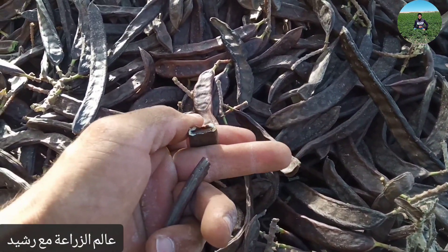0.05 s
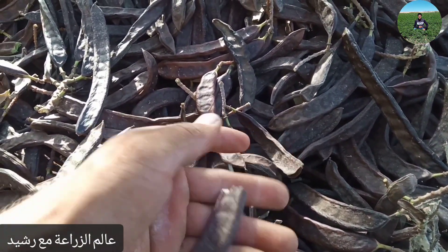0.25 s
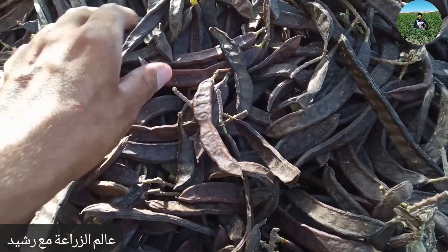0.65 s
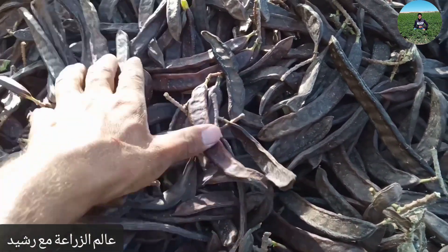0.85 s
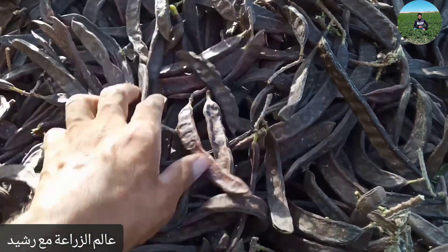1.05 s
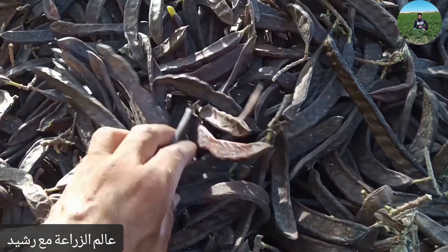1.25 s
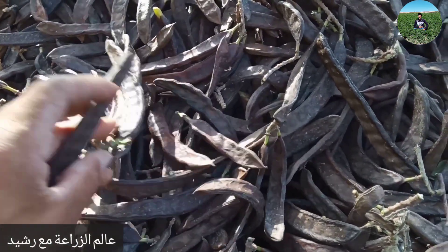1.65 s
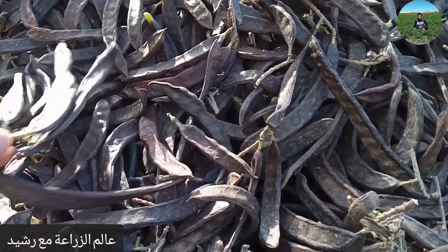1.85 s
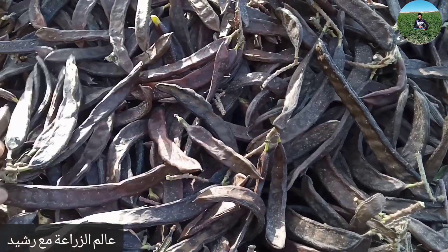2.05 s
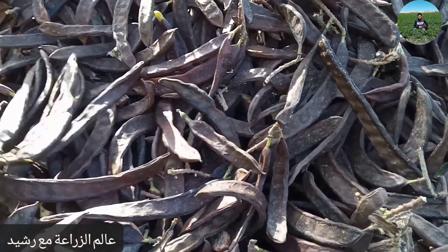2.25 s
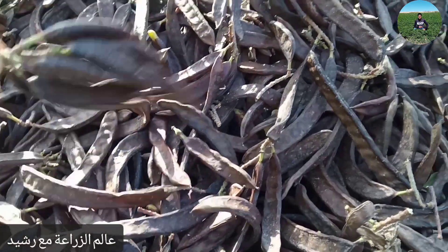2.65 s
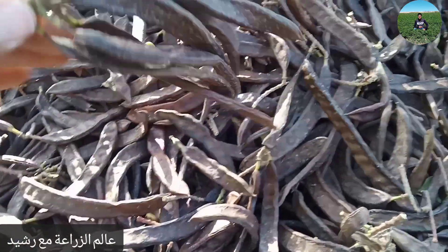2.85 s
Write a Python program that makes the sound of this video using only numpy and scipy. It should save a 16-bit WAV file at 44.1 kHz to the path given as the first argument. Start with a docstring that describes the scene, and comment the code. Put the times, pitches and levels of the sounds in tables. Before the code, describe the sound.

Dry pods clack and rustle under a hand, close to the microphone outdoors. A few pieces drop with sharp clicks, then a dense burst of rummaging thins into lighter stirring and a brief rattle, over faint open air.

```python
"""Outdoors, close to a pile of dry carob pods, on one microphone.
A hand drops pieces of pod on the pile, rummages through it and lets the pods settle.
Up front, each hard contact rings a pod's woody shell for a few milliseconds. Countless small contacts
and sliding husks make the rustle; skin brushes past, the pile thuds and one pod rattles.
A faint, even rumble of open air lies behind it all."""
import sys
import numpy as np
from scipy import signal
from scipy.fft import rfft, irfft, next_fast_len
from scipy.io import wavfile
from scipy.ndimage import uniform_filter1d, map_coordinates

SR = 44100
rng = np.random.default_rng(int(sys.argv[2]) if len(sys.argv) > 2 else 0)


def to_wav(sig):
    """Store sig (one row per channel, or 1-D mono) as 16-bit WAV at the path in sys.argv[1].

    Samples outside -1..1 are clipped; the rate is SR.
    """
    pcm = np.clip(np.atleast_2d(sig), -1, 1) * 32767
    pcm = np.round(pcm).astype(np.int16)
    wavfile.write(sys.argv[1], SR, pcm.T)  # frames by channels


N = 127890
SIZE = 8192  # samples in one short sound or filter


def amp(db):
    """Decibels to gain."""
    return 10 ** (np.asarray(db) / 20)


def unit(x):
    """Scale to rms 1."""
    return x / np.sqrt(np.mean(x ** 2) + 1e-20)


def along(points, hz):
    """Read (Hz, value) points on a log frequency axis."""
    f, v = np.transpose(points)
    return np.interp(np.log(hz + 1), np.log(f + 1), v)


def fade(t, t60):
    """Exponential decay, 60 dB down at t60."""
    return np.exp(-np.log(1000) * t / t60)


def add(track, start, sound):
    """Mix a sound into the track at start seconds."""
    part = track[max(round(start * SR), 0):][:len(sound)]
    part += sound[:len(part)]


def minimum_phase(db):
    """Causal frequency response with these gains."""
    cepstrum = irfft(np.log(amp(db)))
    cepstrum[1:SIZE // 2] *= 2
    cepstrum[SIZE // 2 + 1:] = 0
    return np.exp(rfft(cepstrum))


def coloured(x, spectrum):
    """Pass x through a body with this spectrum and scale it to rms 1."""
    body = irfft(minimum_phase(along(spectrum, np.fft.rfftfreq(SIZE, 1 / SR))))
    return unit(signal.fftconvolve(x, body)[:len(x)])


def friction(rough_db, flutter_per_s):
    """Rough surfaces rubbing: noise whose level flutters at random."""
    noise = rng.standard_normal(N)
    position = np.arange(N) * flutter_per_s / SR
    flutter = map_coordinates(rng.standard_normal(4000), [position], mode="mirror")
    return noise * amp(rough_db * flutter)


# The open air behind the pile. Each row: frequency in Hz, relative level in dB.
AIR_SPECTRUM = [(25, -19), (50, -12), (85, -0.5), (150, -2), (300, -4.5), (550, -7.5), (1100, -13),
                (2500, -17), (6500, -30), (10000, -28.5), (15500, -37)]
def outdoor_air():
    """Faint, even rumble and hiss."""
    return amp(-63.5) * coloured(rng.standard_normal(N), AIR_SPECTRUM)


# The low body of the pile. Each row: frequency in Hz, relative level in dB.
THUD_SPECTRUM = [(40, -30), (130, 27), (330, 3.5), (600, 25), (2000, -38)]
# The hand bumps the pile. Each row: start in seconds, level in dB before the envelope.
BUMPS = [(.276, -56), (.83, -48), (1.058, -58), (1.215, -59), (2.47, -56)]
def pile_thuds(t60=0.14, rise_s=0.014):
    """The whole pile answers a bump with a soft, low thud."""
    out, t = np.zeros(N), np.arange(SIZE) / SR
    for start, db in BUMPS:
        body = coloured(rng.standard_normal(SIZE), THUD_SPECTRUM)
        add(out, start, amp(db) * body * fade(t, t60) * (1 - fade(t, rise_s)))
    return out


# The bright hiss of skin on husk. Each row: frequency in Hz, relative level in dB.
BRUSH_SPECTRUM = [(300, -44), (2000, 9), (5000, 5), (7000, 11.5), (9500, 2.5), (12000, 1.5), (15500, -13)]
# Light strokes of the hand. Each row: centre in seconds, half length in seconds, level in dB.
STROKES = [(0.105, 0.048, -65.5), (1.06, 0.042, -48.5), (1.185, 0.047, -43.5), (1.476, 0.038, -57),
           (1.897, 0.048, -59), (2.063, 0.071, -54.5), (2.238, 0.11, -60.5), (2.462, 0.05, -52),
           (2.585, 0.0081, -54), (2.7, 0.068, -60)]
def skin_brushes():
    """Skin and husk brush past each other in soft swishes that swell and fade."""
    t = np.arange(N) / SR
    swell = sum(amp(db) * np.exp(-((t - centre) / half) ** 2) for centre, half, db in STROKES)
    return swell * coloured(friction(rough_db=3, flutter_per_s=240), BRUSH_SPECTRUM)


# Touches of one swung pod. Each row: start in seconds, level in dB before the envelope.
RATTLE_TOUCHES = [(2.522, -38), (2.644, -42), (2.676, -37.5), (2.69, -41), (2.712, -45)]
def pod_rattle(note_hz=1745, t60=0.026, rise_s=0.0052):
    """A swung pod rattles with one hollow note, its pitch a little different at each touch."""
    out, t = np.zeros(N), np.arange(SIZE) / SR
    for start, db in RATTLE_TOUCHES:
        hz = note_hz * (1 + 0.026 * rng.standard_normal())
        add(out, start, amp(db) * np.sin(2 * np.pi * hz * t) * fade(t, t60) * (1 - fade(t, rise_s)))
    return out


def small_ticks(per_s=600, spread_db=3, crack_t60=0.0094, ring_t60=0.017, count=3000, samples=900):
    """Each small contact gives a crack of noise and rings three modes of its pod."""
    out, t = np.zeros(N), np.arange(samples) / SR
    cracks = rng.standard_normal((count, samples)) * fade(t, crack_t60)
    modes_hz = rng.uniform(1417, 6886, (count, 3, 1))
    starts = (np.arange(count) + 2 * rng.random(count)) / per_s
    gains = amp(spread_db * np.clip(rng.standard_normal(count), -2, 2))
    ringing = 0.33 * fade(t, ring_t60)
    for start, gain, crack, hz in zip(starts[starts < N / SR], gains, cracks, modes_hz):
        add(out, start, gain * (crack + ringing * np.sin(2 * np.pi * hz * t).sum(0)))
    return out


# The many pods heard together. Each row: frequency in Hz, relative level in dB.
PILE_SPECTRUM = [(50, -18), (150, -19), (450, -17), (1000, -6.5), (1750, -6), (2450, -10.5), (3100, -1.5),
                 (3800, -0.5), (4900, -1.5), (6200, -3.5), (7600, -14.5), (9800, -13), (12500, -22.5),
                 (15500, -34)]
# Husk sliding on husk. Each row: frequency in Hz, relative level in dB.
HUSK_SPECTRUM = [(50, -26), (150, -9), (350, -10), (1000, -12.5), (1750, -7), (2450, -9), (3700, -1),
                 (4900, -9.5), (6200, -6), (7600, -11.5), (9800, -17), (15500, -26)]
# How hard the hand stirs the pile. Each row: time in seconds, gain of the rustle in dB.
STIRRING = [(0, -72), (.11, -64), (.22, -66), (.3, -63), (.4, -69.5), (.48, -60), (.62, -66.5), (.7, -59),
            (.76, -42.5), (0.838, -33.5), (.93, -34.5), (.98, -38), (1.06, -37), (1.101, -39.5),
            (1.143, -28.5), (1.185, -37), (1.225, -36), (1.28, -40), (1.35, -52), (1.39, -46),
            (1.44, -41.5), (1.49, -43), (1.53, -51.5), (1.58, -47), (1.65, -53.5), (1.72, -50),
            (1.77, -56.5), (1.8, -48.5), (1.85, -52.5), (1.895, -41.5), (1.96, -56), (2.03, -52.5),
            (2.065, -48), (2.11, -51), (2.22, -56.5), (2.26, -57), (2.32, -54), (2.37, -52), (2.44, -47.5),
            (2.51, -41), (2.56, -43), (2.61, -55), (2.65, -45), (2.7, -53), (2.765, -58), (2.79, -60.5),
            (2.89, -55)]
def pile_rustle():
    """Small contacts tick and rough husks slide, both as loud as the stirring is hard."""
    ticks = amp(-4.5) * coloured(small_ticks(), PILE_SPECTRUM)
    slide = amp(-9.5) * coloured(friction(rough_db=1.5, flutter_per_s=69), HUSK_SPECTRUM)
    stir_db = np.interp(np.arange(N) / SR, *np.transpose(STIRRING))
    return (ticks + slide) * amp(stir_db)


def shell_ring(t, t60, scatter_db=-20, scatter_t60=0.082):
    """Spectrum of a blow: dense, dying modes and their scatter through the pile, flat over broad bands."""
    envelope = fade(t, t60) + amp(scatter_db) * fade(t, scatter_t60)
    ring = rng.standard_normal(len(t)) * envelope
    ring[0] += 4.6  # the first impact stands above the ringing
    spectrum = rfft(ring)
    band_power = np.abs(uniform_filter1d(np.abs(spectrum) ** 2, 130))
    return spectrum / np.sqrt(band_power + 1e-12)


# A dry shell's response to a blow. Each row: frequency in Hz, relative level in dB.
SHELL_SPECTRUM = [(60, -107), (300, -21.5), (800, -14), (1750, -7), (2600, -6), (3000, 0), (3380, 6),
                  (3700, 8), (4080, 8.5), (4700, 6.5), (5400, 3.5), (6100, 7), (7500, -9), (9800, -15),
                  (12000, -19), (15500, -46)]
# Pod strikes pod, close to the microphone. Each row: start in seconds, level in dB, relative
# gains in dB of the hollow knock, the upper ring and the snap, then the ring's t60 in seconds.
BLOWS = [(0.2439, -42, -2, -12, -8, 0.018), (0.2471, -31, 5.5, 3.0, 6, 0.01),
         (0.2501, -26.5, -0.5, -1, 2, 0.011), (0.2758, -18.5, 1, -4.5, 2.5, 0.01),
         (0.2774, -25.5, -29, -21, 2, 0.018), (0.293, -32.5, -15, -8, 0, 0.02),
         (0.2995, -31.5, -16.0, -1, 4, 0.0078), (0.3204, -38.5, 3.5, -3, 3, 0.018),
         (0.3315, -32, -10.0, -17, -4.0, 0.0076), (0.3387, -42, 2, -7, -1, 0.018),
         (0.3449, -34, -2, -4.0, 2, 0.012), (0.4285, -23.5, 6.5, 8, 18, 0.0088),
         (0.433, -39.5, 4, -19, -6, 0.017), (0.4388, -34, -11, 2.0, -9, 0.012),
         (0.4588, -22.4, -12, 3.5, 21.5, 0.013), (0.4613, -26.5, 6, 3.0, 5, 0.0042),
         (0.4823, -40.5, 1, -17, 1.0, 0.009), (0.494, -38.5, 6.5, -3, 17, 0.0057),
         (0.518, -45.5, 12, -5.0, -1.0, 0.012), (0.527, -35, 3, -6, -7, 0.011),
         (0.7236, -45, 12, -2, -14, 0.018), (0.7513, -36.5, -6.0, -3, 7, 0.012),
         (0.7574, -33.5, -5.0, -1, 4, 0.018), (0.7708, -34, -16, 7, 0.0, 0.018),
         (0.7904, -34, 4, 0, 6, 0.022), (0.8063, -31.5, 3, -3, 5.0, 0.016),
         (0.849, -27.5, -19, 0, 1, 0.018), (0.888, -32, -14, -3, -28, 0.012),
         (0.938, -32, -1, -2, -8, 0.028), (0.9982, -32, 2, -9, -11, 0.018),
         (1.0083, -31.5, 5, 5.5, 9, 0.021), (1.0212, -36, 3.0, 3.0, -1.0, 0.012),
         (1.0577, -31.5, -18, -9, 4, 0.011), (1.0636, -31, -13, 19, 18, 0.015),
         (1.076, -34, -13, -14, 0, 0.015), (1.142, -26, -7, -1, -12, 0.02), (1.1469, -35, 7, 5, -6, 0.0093),
         (1.1532, -21.5, -18, 0.0, 0, 0.015), (1.1609, -24.5, 0, 2, -1, 0.015),
         (1.165, -27, -3, -8, 6, 0.017), (1.1928, -25.5, 7, 1.5, 10.5, 0.023),
         (1.201, -26.7, -15, -1.0, 1, 0.017), (1.2165, -29.5, 8.5, 1, 6, 0.016),
         (1.221, -26.5, -1, -3, 5, 0.034), (1.2299, -27.5, -16, -2, 11.5, 0.0082),
         (1.2391, -32, -22, 0.0, 8, 0.014), (1.2557, -34, -11, -4, -16, 0.014),
         (1.281, -33.5, -13, -2.0, -6.0, 0.02), (1.2848, -32.5, -0.5, -9, -13, 0.012),
         (1.2896, -35, -7, -3, -13, 0.0118), (1.311, -41, 6, 2, 5, 0.014),
         (1.3802, -40.5, -4, -8, -5, 0.012), (1.435, -39.5, 8, -1, 8, 0.025),
         (1.4652, -38, 17, 10, 16, 0.02), (1.5706, -40.5, 15, 7, 12, 0.014),
         (1.5933, -41, 10, -5.0, 4, 0.014), (1.6, -51, -2.0, -1.0, -4.0, 0.012),
         (1.6104, -46, 13, -5, 12, 0.018), (1.801, -48, 0, -11, 0, 0.018),
         (1.8628, -36.5, 9, 11.5, 11, 0.0055), (1.8802, -39, 5, 9, -3, 0.012),
         (1.8839, -34, 9.5, 1, 11, 0.018), (1.9006, -37, 18.5, 9.5, 17, 0.025),
         (1.9271, -43, 5, -3, -4.0, 0.015), (1.9368, -41.5, -3, -11, 6, 0.0052),
         (1.945, -41.5, 9, -4, -7, 0.013), (2.0464, -29.5, 5, 6.5, -1, 0.0053),
         (2.1545, -41.5, 7, -0.5, 0, 0.0091), (2.2917, -29, 2.5, 3.5, -8.0, 0.0087),
         (2.331, -50.5, 13, -10, 0, 0.016), (2.4294, -40.5, 4, -6, 3, 0.011),
         (2.464, -35.5, 17.5, -4, 5, 0.019), (2.4739, -39, 4, 0.0, 14, 0.022),
         (2.491, -34, 8.5, 1, -1, 0.013), (2.5012, -38, -5, -5, -5, 0.017),
         (2.524, -31.5, 8.5, 6, 6, 0.015), (2.5355, -36.5, 17, 14, 0.0, 0.008),
         (2.6292, -22.5, 1, 4, 3.5, 0.0046), (2.6457, -34, 1.5, -9, -2, 0.013),
         (2.673, -41, 9, 3, 4, 0.021), (2.7557, -38.5, 12, 5, 9.5, 0.0093),
         (2.7655, -48, 10, -6, -2, 0.018)]
def pod_clacks(knock_hz=2830, upper_hz=4660, snap_hz=7630, edge_hz=11400, uneven_db=2.12):
    """Every blow rings different shell modes, coloured by where and how hard the pods meet."""
    out, t, hz = np.zeros(N), np.arange(SIZE) / SR, np.fft.rfftfreq(SIZE, 1 / SR)
    above = lambda corner_hz: 1 - 1 / (1 + (hz / corner_hz) ** 20)
    knock_band = 1 - above(knock_hz)
    upper_band = above(upper_hz) - above(snap_hz)
    snap_band = above(snap_hz) - 0.49 * above(edge_hz)  # about half depth in the highest treble
    blow_norm = np.sqrt(0.003 * SR)  # the energy of 3 ms at rms 1
    for start, db, knock_db, upper_db, snap_db, t60 in BLOWS:
        spacing_hz = 3.2 / t60  # a shorter ring has broader peaks
        peaks = map_coordinates(rng.standard_normal(200), [hz / spacing_hz], mode="mirror")
        colour_db = along(SHELL_SPECTRUM, hz) + uneven_db * peaks
        colour_db += knock_db * knock_band + upper_db * upper_band + snap_db * snap_band
        clack = irfft(shell_ring(t, t60) * minimum_phase(colour_db))[:SIZE // 2]
        add(out, start, amp(db) * blow_norm * clack / np.linalg.norm(clack))
    return out


def scene():
    """The pile close to one microphone in the open."""
    mix = pod_clacks() + pile_rustle() + pod_rattle() + pile_thuds() + outdoor_air() + skin_brushes()
    return mix[None]


def record(dry):
    """The recorder keeps nothing above 16 kHz."""
    padded = next_fast_len(N + SIZE)
    passband = np.fft.rfftfreq(padded, 1 / SR) < 16000
    return irfft(rfft(dry, padded) * passband, padded)[:, :N]


dry = scene()
out = record(dry)
to_wav(out)
```